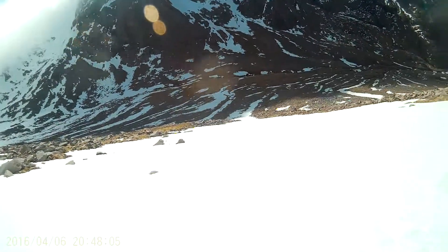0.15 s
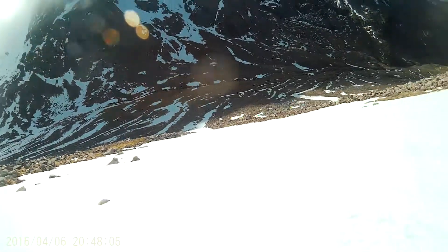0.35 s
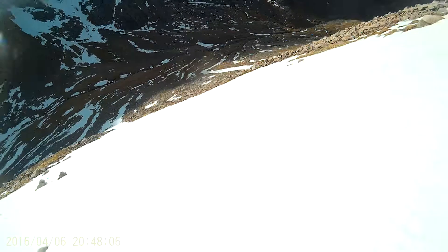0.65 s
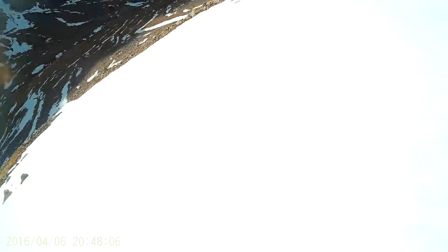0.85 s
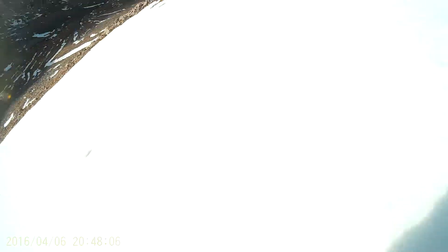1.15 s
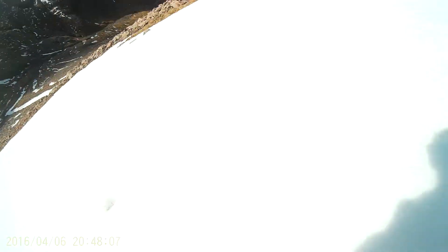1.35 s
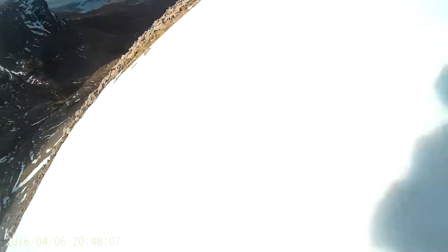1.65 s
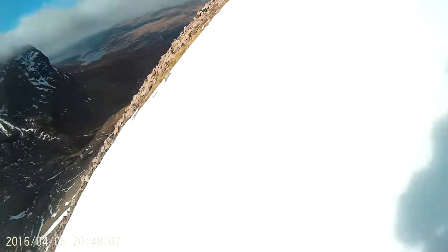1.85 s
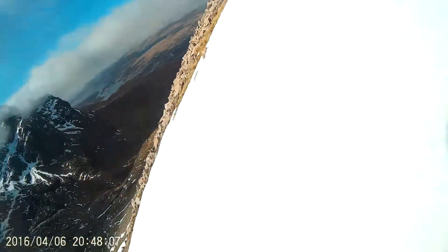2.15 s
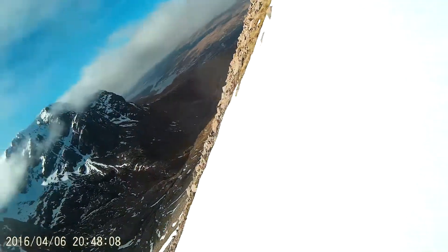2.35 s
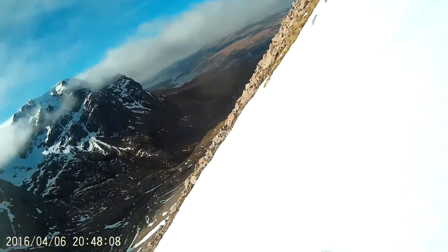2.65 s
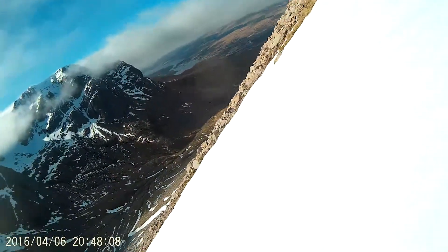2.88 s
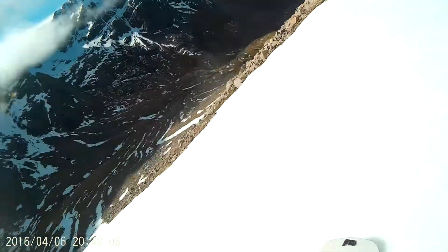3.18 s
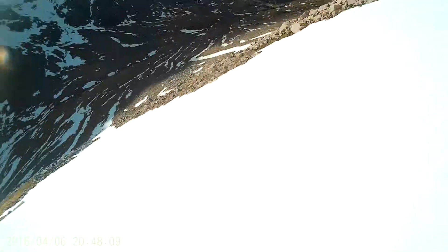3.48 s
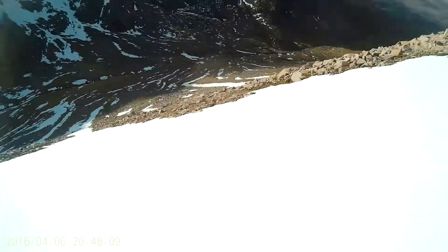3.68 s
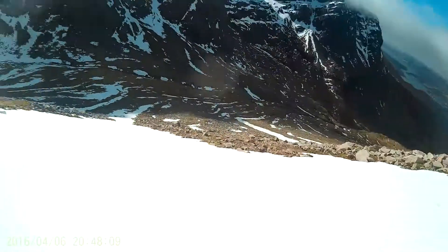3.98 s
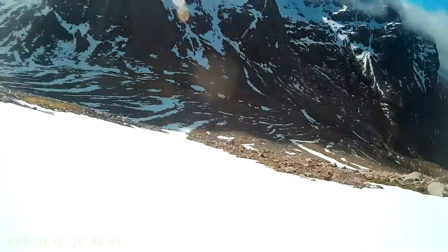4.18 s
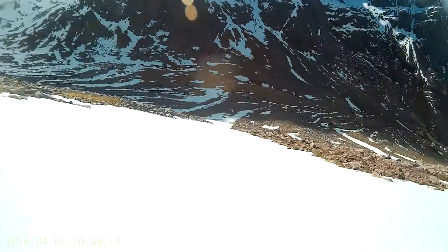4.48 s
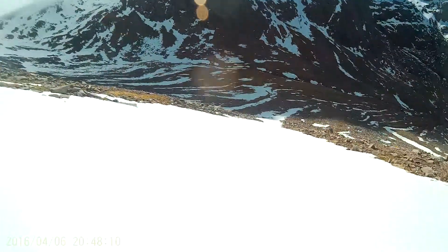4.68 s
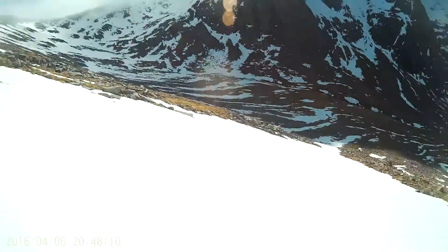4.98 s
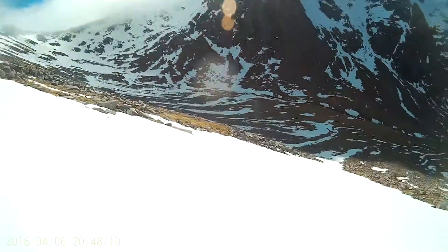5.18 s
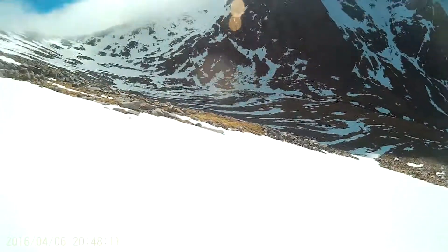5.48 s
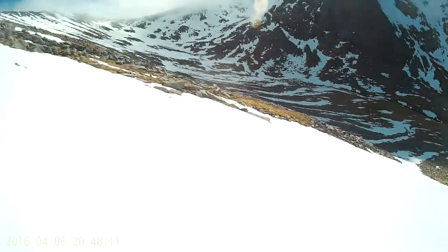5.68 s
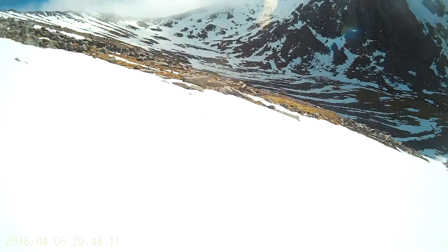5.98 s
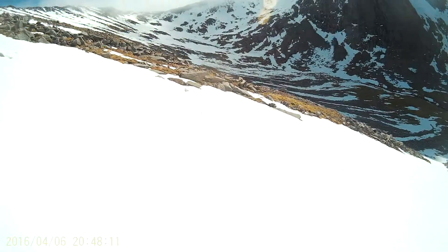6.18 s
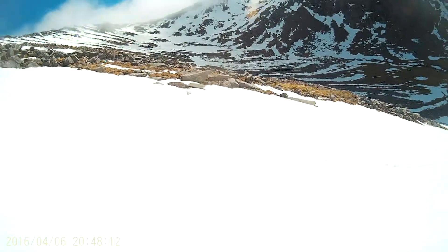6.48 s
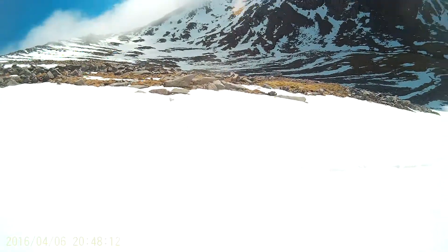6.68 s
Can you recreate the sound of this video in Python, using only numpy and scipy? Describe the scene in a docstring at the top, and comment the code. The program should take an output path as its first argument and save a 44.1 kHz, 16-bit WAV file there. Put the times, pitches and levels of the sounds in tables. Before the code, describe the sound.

Close grainy snowboard scraping and hissing on a snowy slope, with one short hoarse whistle-like squeak, a brief lull, and crunchy edge bites.

```python
"""A snowboard slides down coarse spring snow: the flat base hisses and the edge scrapes, bites and rasps.
Snow sounds are noise of breaking grains, filtered by the resonances of a camera case on the rider and
driven by the load on the board; rasps are narrow-band noise, and stray crystals add bright ticks.
A short hoarse whistle, a frequency-modulated sine, rises once in spurts. Behind lie soft low-mid noise,
wind (shaped noise with gusts), thumps (decaying low sines), and the camera's steady tones and hiss."""
import sys
import numpy as np
from scipy import signal
from scipy.fft import rfft, irfft
from scipy.io import wavfile
from scipy.ndimage import uniform_filter1d

SR = 44100
rng = np.random.default_rng(int(sys.argv[2]) if len(sys.argv) > 2 else 0)


def wav_out(sig):
    """Save sig, one row per channel (or a flat mono array), as 16-bit PCM at SR to the path in sys.argv[1]."""
    wavfile.write(sys.argv[1], SR, np.round(np.clip(np.atleast_2d(sig).T, -1, 1) * 32767).astype(np.int16))


N = 301644
TIME = np.arange(N) / SR  # s
BINS = np.fft.rfftfreq(N, 1 / SR)  # Hz
SPRAY_SLOPE = 0.43  # dB of spray and ticks per dB of load
# swells of narrow-band noise, rasps and soft low-mid noise: peak t/s, length t/s, centre f/Hz, peak level/dB
SWELLS = [(0.107, 0.12, 1680, -40.5), (0.398, 0.49, 1170, -39.5), (0.587, 0.14, 4050, -51.5),
          (1.364, 1, 1800, -51.5), (1.709, 0.15, 1770, -37.5), (1.716, 0.2, 346, -54.5),
          (1.986, 0.56, 1810, -42), (2.5, 0.099, 2300, -43), (2.675, 0.59, 1650, -44),
          (3.193, 0.55, 705, -59), (3.528, .02, 2280, -55.5), (3.765, 0.2, 1660, -50),
          (3.8, 0.46, 564, -60), (5.884, 0.41, 1690, -40), (6.45, 0.22, 2350, -49)]


def gain_of(db):
    """Level to amplitude: 20 dB is a factor of ten."""
    return 10 ** (np.asarray(db) / 20)


def rms(x):
    """Effective value: the root of the mean power."""
    return np.sqrt(np.mean(x ** 2) + 1e-20)


def follow(rows):
    """Linear interpolation of a (time, value) curve at every sample."""
    times, values = np.transpose(rows)
    return np.interp(TIME, times, values)


def read(points, hz, axis=1):
    """Spectral interpolation: one column, joined on a log-frequency axis."""
    table = np.transpose(points)
    return np.interp(np.log(hz + 1), np.log(table[0] + 1), table[axis])


def band(x, lo, hi):
    """Ideal band-pass: only spectral bins between two frequencies remain."""
    return irfft(rfft(x) * ((BINS >= lo) & (BINS < hi)), N)


def lowpass(x, hz):
    """Zero-phase low-pass with a smooth roll-off, half amplitude at hz."""
    return irfft(rfft(x) / (1 + (BINS / hz) ** 4), N)


def wander(per_s):
    """Random modulation: low-passed noise of unit rms, mostly slower than per_s swings a second."""
    x = lowpass(rng.standard_normal(N), per_s)
    return x / rms(x)


def shaped_noise(points):
    """Spectral shaping: steady noise of unit rms with the given spectrum."""
    x = irfft(rfft(rng.standard_normal(N)) * gain_of(read(points, BINS)), N)
    return x / rms(x)


def strength(x, lo, hi):
    """Short-time power: running rms of one band over 0.2 s."""
    return np.sqrt(uniform_filter1d(band(x, lo, hi) ** 2, size=SR // 5))


def board():
    """Granular friction: glide blends into scraping as the board tips, and load drives every band."""
    # stance: t/s, share of the sound power from the edge (the rest is the flat base)
    stance = [(0, 0.8), (.25, 1), (.58, 1), (.8, 0.24), (1.5, 0.24), (1.75, 0), (2.2, 0), (3.2, 0),
              (3.7, 0.52), (4.1, 1), (5.5, 0.73), (6.84, 0.67)]
    # brightness: t/s, level added to the spray band/dB
    brightness = [(0.1, -0.3), (0.7, 1.5), (1.35, -1.5), (1.6, 2), (2.0, 4), (2.3, 0.5), (3.25, -2.5),
                  (3.55, -10), (3.92, 0.5), (5.35, 2.4), (6.3, -2.4)]
    cruise_db, crunch_db, spray_db = -41.5, -45.5, -57.5  # reference levels at zero load, flat base; the rub band plays 1.83 dB below cruise_db
    crunch_edge_db = 1  # added with the edge fully set
    crunch_slope, crunch_edge_slope = 0.64, 0.47  # dB per dB of load on the base, and what the edge adds
    packing_s, packing_smooth_s = 0.028, 0.43  # dB per dB/s of load growth; averaging time

    edge = np.clip(follow(stance), 0, 1)
    glide = grains(clump_db=0.33, clumps_per_s=230, judder_db=0.5, judders_per_s=20,
                   cracks_per_s=230, crack_db=-11.5)
    scrape = grains(clump_db=0.04, clumps_per_s=220, judder_db=1.03, judders_per_s=13.3,
                    cracks_per_s=400, crack_db=-12)
    slide = np.sqrt(1 - edge) * signal.oaconvolve(glide, ringing(axis=1))[:N]
    slide += np.sqrt(edge) * signal.oaconvolve(scrape, ringing(axis=2))[:N]

    # packing snow crunches low, the rubbing base fills the middle, flying crystals fizz on top
    crunch = lowpass(slide, 2000)
    spray = slide - lowpass(slide, 5800)
    rub = slide - crunch - spray
    # even out each band so that the level curves below set its slow level
    crunch /= strength(slide, 300, 1450)
    rub /= strength(slide, 2000, 6000)
    spray /= strength(slide, 6500, 15000)

    load = pressure()
    # snow crunches more while the load grows than while it eases
    smooth_load = uniform_filter1d(load, size=int(packing_smooth_s * SR))
    packing_db = packing_s * SR * np.gradient(smooth_load)
    lumps_db = 1.0 * wander(60) + 0.5 * wander(3.3)  # packed snow gives way unevenly
    crunch_level = crunch_db + crunch_edge_db * edge + (crunch_slope + crunch_edge_slope * edge) * load
    crunch_level += packing_db + lumps_db
    rub_level = cruise_db + load - 1.83
    spray_level = spray_db + SPRAY_SLOPE * load + follow(brightness) + 0.5 * wander(40)
    return crunch * gain_of(crunch_level) + rub * gain_of(rub_level) + spray * gain_of(spray_level)


def pressure():
    """Dynamic load in dB over an easy glide: slow turns plus brief sideways skids."""
    # loading through the turns, light at two moments: t/s, load on a level scale/dB
    turns = [(0.0, -40), (0.2, -44), (0.54, -42.5), (0.66, -55), (0.89, -61), (1.16, -54), (1.42, -53.5),
             (1.58, -45.5), (2.0, -41.5), (2.34, -44), (3.14, -41), (3.45, -68.5), (3.66, -59),
             (3.88, -45.5), (4.16, -36), (4.35, -34), (4.86, -44.5), (5.09, -45.5), (5.25, -40),
             (5.57, -42), (5.9, -40), (6.45, -42.5), (6.65, -46.5)]
    # skids: start t/s, hold t/s, added load/dB
    skids = [(0.222, 0.23, 8), (1.47, 0.02, 4), (1.54, 0.017, 2.5), (1.705, 0.01, 3), (3.85, 0.017, 2),
             (4.048, 0.092, 2), (4.497, 0.02, 3), (4.703, 0.017, 6.5), (4.922, 0.046, 7.5),
             (5.109, 0.027, 11.5), (5.337, 0.047, 7.5), (5.61, 0.074, 4), (6.095, 0.029, 1.5),
             (6.716, 0.088, 6)]
    easy_glide_db, attack_s, release_s = -41.5, 0.033, 0.072
    end_share = 0.77  # part of the added load that is left when the edge lets go
    load = follow(turns) - easy_glide_db
    for start, hold, added_db in skids:
        corners = start + np.cumsum([0, attack_s, hold, release_s])
        load = load + added_db * np.interp(TIME, corners, [0, 1, end_share, 0])
    return load


def grains(clump_db, clumps_per_s, judder_db, judders_per_s, cracks_per_s, crack_db):
    """Shot noise: dense grains merge into noise, sparse cracks stand out, clumps and judder modulate it."""
    sizes = gain_of(1.17 * np.minimum(rng.exponential(1, N), 5))
    happens = rng.random(N) < cracks_per_s / SR
    cracks = sizes * rng.choice([-1, 1], N) * happens
    x = rng.standard_normal(N) + gain_of(crack_db) * cracks / rms(cracks)
    x *= gain_of(clump_db * wander(clumps_per_s) + judder_db * wander(judders_per_s))
    return x / rms(x)


def ringing(axis, size=4096):
    """Minimum-phase impulse response of snow and case; axis 1 is the base, 2 the edge."""
    # broad relative spectrum of sliding: f/Hz, base level/dB, edge level/dB
    snow = [(50.0, -19, -48), (162, -20.5, -17.5), (328, -7.5, -11.5), (704, -6.5, -7.5), (1408, 0.5, -0.5),
            (2623, -8, -9), (4190, -15, -15), (5970, -20.5, -26), (9350, -28, -37.5), (13200, -27.5, -41),
            (15600.0, -43, -51)]
    # case resonances: centre f/Hz, full width f/Hz, base lift/dB, edge lift/dB
    case = [(394, 117, -3, 5), (936, 270, 1.5, 5), (1170, 280, 1.5, 4.5), (1652, 220, 0.5, 7.5),
            (1841, 110, 3.5, 8), (2246, 420, 11, 9.5), (2946, 388, 12, 9.5), (3282, 390, 8, 5),
            (3790, 390, 6.5, 4), (4090, 346, 6.5, 6.5), (4654, 400.0, 7.5, 3), (5316, 820, 7, 6),
            (7130, 850, 8, 4.5), (8030, 230, 5.5, 3), (8650.0, 600.0, 2, 3), (10880, 1840, 4.5, 11),
            (12450, 420, 0, 8), (15100, 900.0, 9, 5)]
    hz = np.fft.rfftfreq(size, 1 / SR)
    db = read(snow, hz, axis=axis)
    for centre, width, *lift in case:
        db = db + lift[axis - 1] * .5 ** ((2 * (hz - centre) / width) ** 2)
    gain = gain_of(db)
    # fix the power between 2 and 6 kHz
    gain /= np.sqrt(np.mean(gain ** 2 * ((hz > 2000) & (hz < 6000))))
    # the Hilbert transform of log gain gives the phase of a causal response
    log_gain = np.log(np.r_[gain, gain[-2:0:-1]])
    return np.fft.ifft(np.exp(np.conj(signal.hilbert(log_gain)))).real[:size // 2]


def bites():
    """Impact excitation: each hard lump shatters under the edge in a short burst of ringing grains."""
    # bites: start t/s, peak force level before filtering/dB, twice the rise time t/s
    lumps = [(0.238, -39, 0.004), (0.256, -35, 0.026), (1.762, -41, 0.035), (3.867, -46, 0.024),
             (4.06, -34.5, 0.014), (4.303, -31.5, 0.026), (4.391, -33.5, 0.024), (5.278, -32, 0.0055),
             (5.619, -41.5, 0.011)]
    force = np.zeros(N)
    for start, db, length in lumps:
        age = np.maximum(TIME - start, 0) / (length / 2)
        force += gain_of(db) * age * np.exp(1 - np.minimum(age, 60))
    burst = signal.oaconvolve(force * rng.standard_normal(N), ringing(axis=2))[:N]
    return lowpass(burst, 4300) - 0.17 * lowpass(burst, 740)  # hard lumps crack in the middle range


def swelling_noise(rows):
    """Windowed narrow-band noise: each swell rises and fades under a cosine-squared envelope."""
    half_width = 0.15  # share of the centre frequency, at half amplitude
    out = np.zeros(N)
    for peak, length, hz, db in rows:
        response = 1 / (1 + ((BINS - hz) / (half_width * hz)) ** 4)
        noise = irfft(rfft(rng.standard_normal(N)) * response, N)
        envelope = np.cos(np.pi * np.clip((TIME - peak) / length, -.5, .5)) ** 2
        out += gain_of(db) * noise / rms(noise) * envelope
    return out


def rasps():
    """Frequency-selective friction: the scraping gathers briefly in one band."""
    return swelling_noise([row for row in SWELLS if not 500 < row[2] < 1000])


def ticks():
    """Random impulses: stray crystals strike the case, harder under load; a high-pass keeps them bright."""
    ticks_per_s, largest_db, above_hz = 4, -39, 6500  # largest impulse at zero load, before the high-pass
    happens = rng.random(N) < ticks_per_s / SR
    hits = rng.uniform(0, 1, N) * happens * gain_of(largest_db + SPRAY_SLOPE * pressure())
    return hits - lowpass(hits, above_hz)


def whistle():
    """Frequency and amplitude modulation: a hoarse, stuttering sine rises and levels off."""
    # spurts: start t/s, length t/s, amplitude level before stutter/dB
    spurts = [(2.533, 0.052, -33), (2.572, 0.085, -36), (2.667, 0.069, -34), (2.744, 0.033, -28.5),
              (2.772, 0.04, -36.5)]
    start_hz, top_hz, rise_hz_per_s, ramp_s = 1580, 1858, 1900, 0.014
    glide_hz = np.clip(start_hz + rise_hz_per_s * (TIME - spurts[0][0]), start_hz, top_hz)
    turns = np.cumsum(glide_hz + 42 * wander(235)) / SR  # phase in cycles, with rough pitch
    level = np.zeros(N)
    for start, length, db in spurts:
        to_nearest_end = np.minimum(TIME - start, start + length - TIME)
        level += gain_of(db) * np.clip(to_nearest_end / ramp_s, 0, 1)
    stutter = np.abs(1 + .33 * wander(130))
    return level * stutter * np.sin(2 * np.pi * turns)


def low_mid_swells():
    """Band-limited noise: soft low-mid noise swells while the board runs light."""
    return swelling_noise([row for row in SWELLS if 500 < row[2] < 1000])


def wind():
    """Turbulence: large eddies buffet the microphone; smaller ones rush with the same airflow."""
    # airflow: t/s, strength on a level scale/dB
    airflow = [(0.0, -58.5), (0.95, -60.5), (1.6, -52), (2.05, -47), (2.8, -57), (3.45, -63.5),
               (4.0, -47.5), (4.55, -60), (5.05, -48), (5.45, -48), (5.9, -59.5), (6.84, -64.5)]
    # gusts that shake the microphone: peak t/s, added buffeting level/dB
    gusts = [(3.05, 19), (4.81, 5.5), (6.28, 10.5)]
    # relative spectral densities: f/Hz, level/dB
    buffet_spectrum = [(2, 2), (7, 10), (13, 10.5), (25, -9.5), (40, -37), (70, -37), (200, -71)]
    rush_spectrum = [(15, -21), (45, 4), (70, -4.5), (110, -5.5), (200, -5.5), (400, -8), (900, -14),
                     (3000, -53)]
    gust_s = 0.14  # from the peak to 1/e of the added dB
    rush_db, breeze_db, rush_slope = -64.5, -54.5, 0.51  # rush in a breeze; dB per dB of airflow
    air_db = follow(airflow)
    gust_db = sum(db * np.exp(-((TIME - peak) / gust_s) ** 2) for peak, db in gusts)
    buffet = shaped_noise(buffet_spectrum)
    buffet /= strength(buffet, 15, 45)
    rush = shaped_noise(rush_spectrum)
    rush /= rms(band(rush, 50, 160))
    rush_level = rush_db + rush_slope * (air_db - breeze_db) + 1.2 * wander(6.9)
    return buffet * gain_of(air_db + gust_db - 6.0) + rush * gain_of(rush_level)


def thumps():
    """Damped oscillation: each jolt rocks the camera for a few slow cycles."""
    # thumps: start t/s, envelope peak level/dB
    jolts = [(1.25, -50), (1.358, -55), (2.87, -55), (3.22, -51), (3.455, -50), (3.92, -50)]
    thump_hz, rise_s = 69, 0.0073
    out = np.zeros(N)
    for start, db in jolts:
        age = np.clip(TIME - start, 0, 1)
        envelope = age / rise_s * np.exp(1 - age / rise_s)
        out += gain_of(db) * envelope * np.sin(2 * np.pi * thump_hz * age)
    return out


def electronics():
    """Stationary self-noise: thin steady sines and faint shaped hiss from the camera itself."""
    # whines: f/Hz, rms level/dB
    whines = [(6804, -77.5), (13608, -89)]
    # relative spectral density of microphone hiss: f/Hz, level/dB
    hiss_spectrum = [(100, 1), (1000, -3), (4000, 4), (6500, 1), (9000, -3), (12000, 1), (15700, -10)]
    whine = sum(gain_of(db) * np.sqrt(2) * np.sin(2 * np.pi * hz * TIME) for hz, db in whines)
    return whine + gain_of(-66) * shaped_noise(hiss_spectrum)


def scene():
    """Linear superposition in the open air: all sources add, with no echo."""
    snow = board() + bites() + rasps() + ticks()
    background = low_mid_swells() + wind() + thumps() + electronics()
    return (snow + whistle() + background)[None]


def record(dry):
    """Band limitation: the camera's steep linear-phase low-pass at 15720 Hz."""
    taps = signal.firwin(801, 15720, window=("kaiser", 9), fs=SR)
    return signal.oaconvolve(dry, taps[None], "same")


dry = scene()
out = record(dry)
wav_out(out)
```